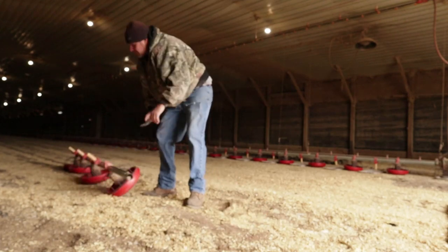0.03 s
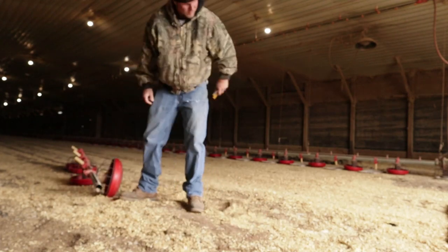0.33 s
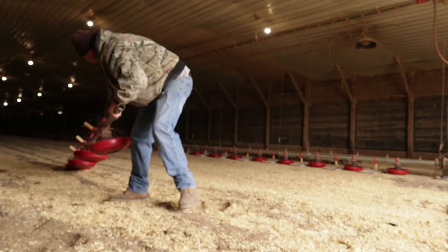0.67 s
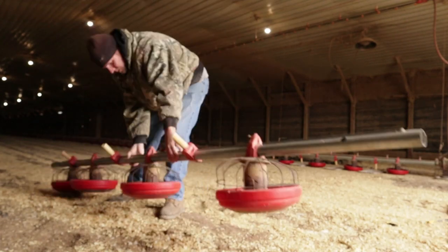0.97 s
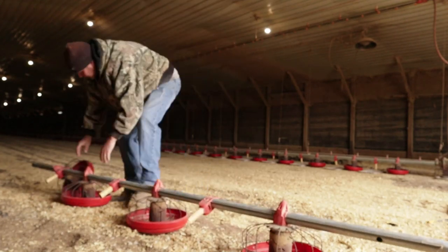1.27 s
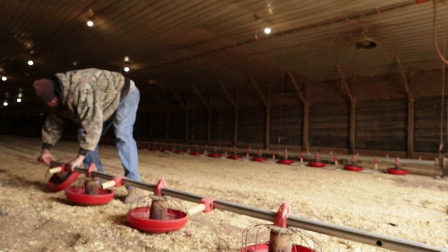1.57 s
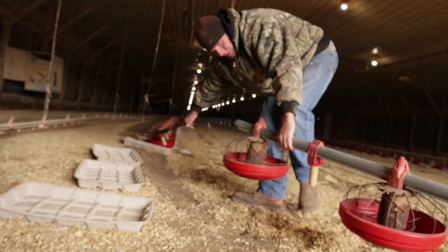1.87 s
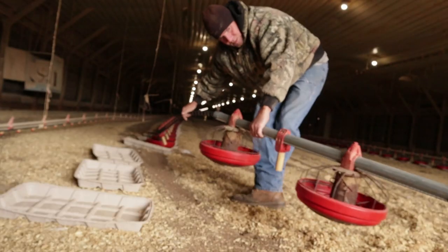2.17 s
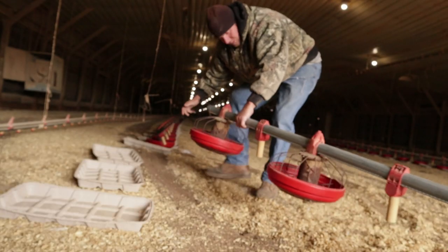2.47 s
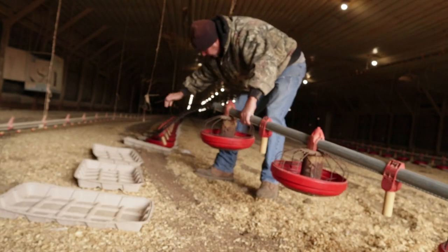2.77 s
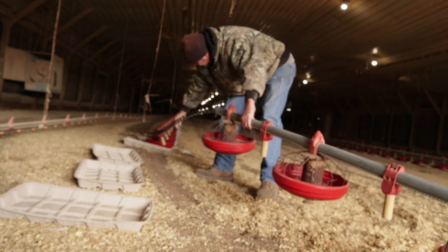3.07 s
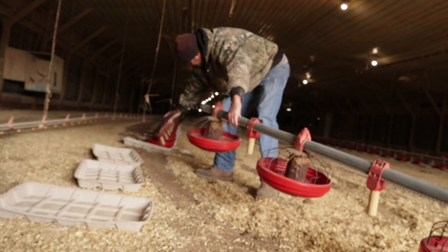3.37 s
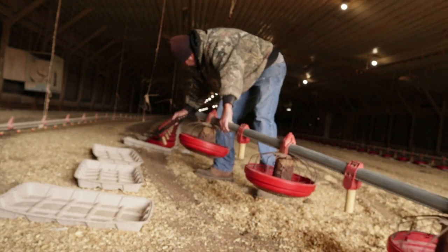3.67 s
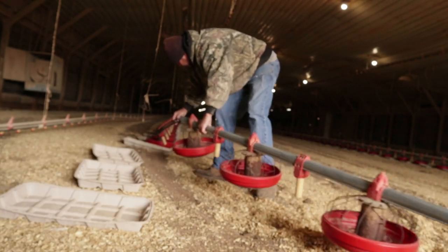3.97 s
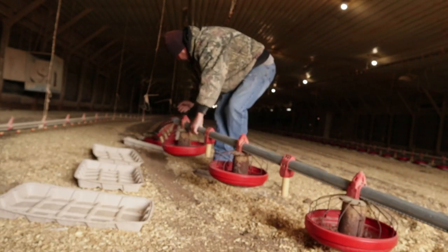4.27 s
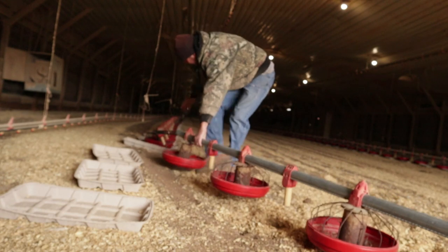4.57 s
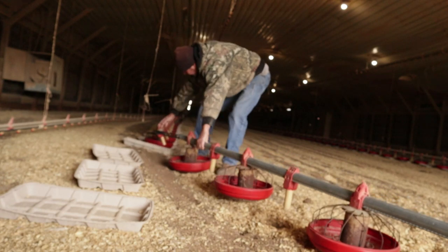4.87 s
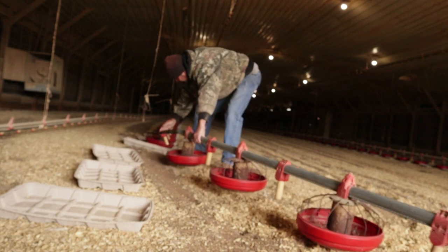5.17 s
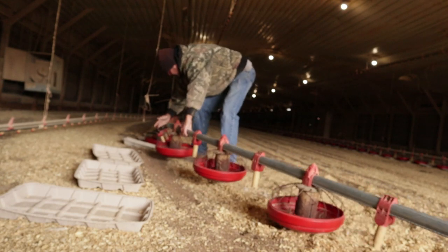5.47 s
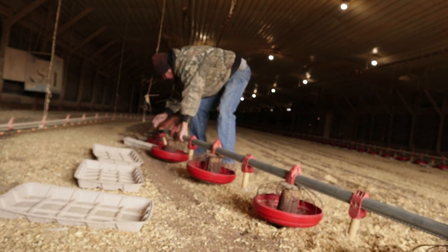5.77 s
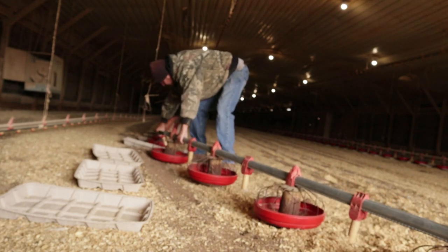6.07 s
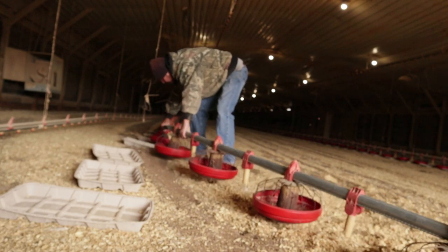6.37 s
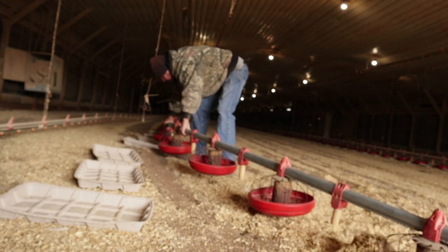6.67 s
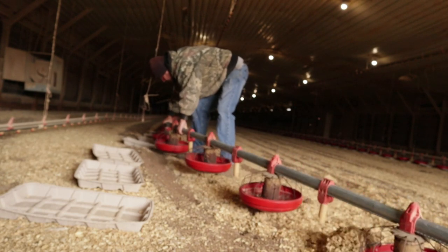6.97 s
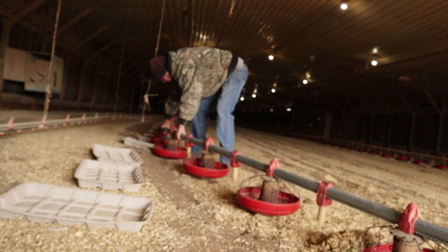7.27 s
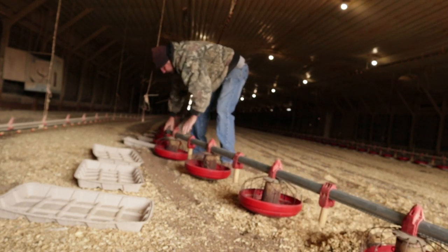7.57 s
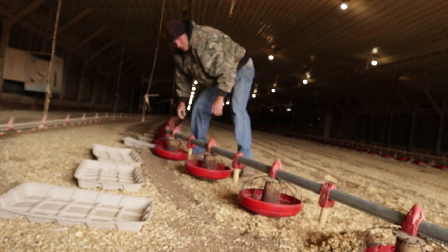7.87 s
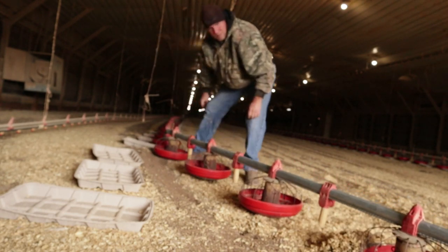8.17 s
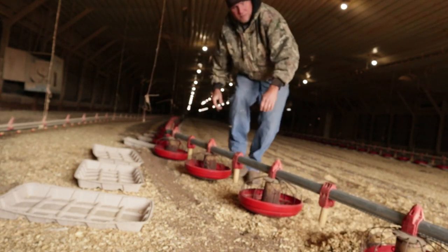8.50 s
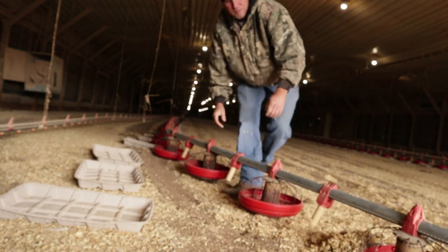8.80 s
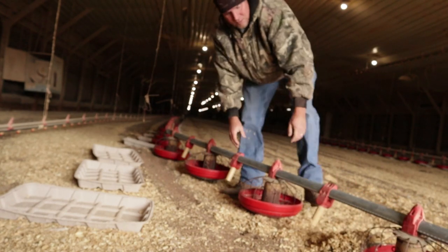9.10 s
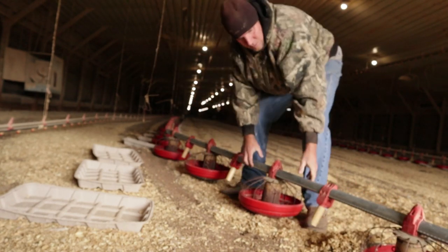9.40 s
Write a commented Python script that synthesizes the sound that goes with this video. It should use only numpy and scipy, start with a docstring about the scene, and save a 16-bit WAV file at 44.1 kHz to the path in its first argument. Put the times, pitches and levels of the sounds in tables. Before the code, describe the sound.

Over a quiet hiss of air in a long poultry house, sharp, close clicks and knocks come from metal parts being fitted together. Then steel scrapes on steel four times, each stroke uneven, with cracking jolts, a faint ring and jingling wire pan guards. After a brief squeak things go quieter, leaving faint rustles of wood shavings and one more clank of the tube with a dull boot thud.

```python
"""Small metal fittings click close by over a quiet hiss of air, then knock together: a worker is
assembling a feed line in a long poultry house. The steel tube is worked along in four rasping
strokes; friction makes it catch, jolt and ring faintly, and the shaking sets the wire guards of
its pans chattering. A bracket squeaks on the tube, and boots thud and scuff in the wood shavings."""
import sys
import numpy as np
from scipy import signal
from scipy.fft import rfft, irfft
from scipy.io import wavfile
from scipy.ndimage import uniform_filter1d

SR = 44100
rng = np.random.default_rng(int(sys.argv[2]) if len(sys.argv) > 2 else 0)


def log_audio(samples):
    """Write samples as a 16-bit WAV file to the path given in sys.argv[1]."""
    # one column per channel
    frames = np.atleast_2d(samples).T
    # limit to full scale, then quantise
    limited = np.clip(frames, -1, 1)
    pcm = np.round(limited * 32767).astype(np.int16)
    wavfile.write(sys.argv[1], SR, pcm)


N = 416304
T = np.arange(N) / SR

# tone of the bright close hiss and of the duller house air: f/Hz, level/dB
BRIGHT_AIR_EQ = [(30, 1), (90, -11), (400, -2), (1000, -4), (2500, -8.5), (8000, -9.5), (14500, -9),
                 (16000, -13)]
HOUSE_AIR_EQ = [(20, -11), (70, -1.5), (130, 2.5), (350, -3), (800, -4), (1500, -7.5), (2400, -11),
                (6000, -13), (10000, -17), (16000, -18.5)]
# crossfade between the two, with a brief dip: t/s, bright gain, house gain
AIR_FADE = [(1.762, 1, 0), (1.778, .1, 0), (1.795, 0, .15), (1.83, 0, 1)]
# the house air sits lower while the tube is worked: t/s, level/dB
AIR_DUCK = [(1.8, -4), (3.1, -4), (4.9, -1), (6.15, -1), (7.6, 0)]
# fittings snapping: t/s, level/dB, rattle against crack/dB, tilt/(dB per octave)
FITTING_SNAPS = [(0.095, -1.5, -7, 0.5), (0.143, -21, -7, 0.5), (0.259, -25.5, -12, 4),
                 (0.5166, 0.5, -17.5, -2), (0.584, -20, 10, 1), (0.619, -28, -14, -1.5),
                 (0.651, -17, -16, 10), (0.658, -21.5, 6, 1), (0.684, -26, -16, -2), (0.8443, -26, 4, 0),
                 (0.861, -18.5, 2, 4), (0.932, -25, 11, -0.5), (1.063, -27, 0, -1), (1.069, -20, 4, -0.5),
                 (1.0847, 4.5, -14, 2), (1.093, -13, -5, -0.5), (1.1812, -4.5, -9.5, 1),
                 (1.2155, -20, -13, -1), (1.2202, -9.5, -17, -2.5), (1.3226, -28, -18, -1.5),
                 (1.3635, -18.5, -11, -1), (1.433, -21, -15, 10), (1.563, -23, -18, -2.5),
                 (1.731, -22.5, 3, -2.5)]
# tone of a snap: f/Hz, level/dB
SNAP_EQ = [(50, -4.5), (500, -10), (1000, -7), (1800, -6), (2700, -2), (4000, -8.5), (8000, -6),
           (14000, -7), (16000, -7)]
# resonances of a fitting: f/Hz, width/Hz, level/dB
FITTING_RING = [(2350, 140, -7), (2800, 300, -1), (4700, 110, -5), (6840, 320, -2), (12500, 140, -27)]
# boots and tube landing on the litter: t/s, level/dB, f/Hz, width/Hz, length/s
LITTER_THUDS = [(0.21, -58.5, 497, 700, 0.12), (0.35, -54, 495, 700, 0.097), (0.46, -46, 540, 900, 0.11),
                (2.70, -48, 387, 300, 0.12), (2.87, -45, 327, 200, 0.069), (4.32, -46, 340, 150, 0.074),
                (4.42, -41.5, 376, 200, 0.067), (4.685, -33.5, 310, 109, 0.04),
                (5.163, -20, 400, 340, 0.042), (7.375, -29, 270, 403.4, 0.053),
                (8.299, -50, 315, 350, 0.068), (8.325, -52.5, 480, 800, 0.072),
                (8.728, -29, 370, 332, 0.12)]
# swells of shavings and clothing: middle t/s, level/dB, half length/s
RUSTLE_SWELLS = [(.79, -47.5, 0.14), (0.866, -31.5, 0.02), (0.964, -43, 0.052), (1.173, -37, .016),
                 (1.41, -47.5, 0.074), (1.75, -31.5, 0.0068), (7.377, -41.5, 0.025), (7.587, -49, 0.11),
                 (8.0, -57, 0.053), (8.6, -50.5, 0.01), (9.03, -54, 0.042), (9.118, -53, .014),
                 (9.417, -45.5, 0.037)]
# tone of the shavings: f/Hz, level/dB
SHAVINGS_EQ = [(100, -11), (500, -11), (1100, -1), (2000, -1.5), (2800, 3.5), (4000, -2), (7500, -1),
               (11000, -10), (16000, -21)]
# parts knocking together: t/s, level/dB, f/Hz, width/Hz, decay/s
PART_KNOCKS = [(1.105, -14, 420, 900, 0.003), (1.468, -5.5, 3140, 2400, 0.0049),
               (1.4736, -1.5, 695, 1900, 0.004), (1.4773, -8.5, 400, 400, 0.012),
               (1.477, -5.5, 155, 130, 0.017), (1.487, 1, 3300, 2200, 0.00091),
               (1.492, -19, 2600, 3500, 0.029), (1.5112, 0, 3470, 650, 0.0023),
               (1.5164, -4, 160, 324, 0.0035), (1.533, -14, 1880, 2500, 0.008),
               (1.5439, -9.5, 1900, 1700, 0.0019), (1.6073, -0.5, 2980, 810, 0.0078),
               (1.614, -2, 2730, 750, 0.0043), (1.6535, -14, 2330, 2500, 0.0028),
               (1.6689, -2.5, 2210, 1190, 0.005), (1.671, -1, 660, 550, 0.0015),
               (1.744, -17, 3620, 3000, 0.0041), (1.752, -1.5, 1260, 1900, 0.0012)]
# pushes on the tube, a light one often leading into a hard one: t/s, attack/s, hold/s, level/dB,
# fall/(dB per s), boom against level/dB, sizzle against level/dB, singing note/dB
TUBE_PUSHES = [(1.774, .16, 0.16, -25, 200, -15.5, -6, -70), (2.085, 0.066, 0.4, -15, 114, -17, -9, -65.5),
               (3.09, 0.26, .08, -38, 199.5, -5.5, -4.5, -75),
               (3.376, 0.11, 0.13, -18.5, 200, -12.5, -10, -55),
               (3.447, 0.22, 0.48, -14.5, 190, -18.5, -7.5, -40),
               (4.433, .21, 0.025, -25.5, 241, -8.5, -7, -57), (4.74, 0.43, .02, -33, 200, -9, -3, -70),
               (4.998, 0.2, 0.61, -17, 104, -12.5, -5.5, -36),
               (6.187, 0.095, 0.18, -28.5, 200, -7.5, -8.5, -46),
               (6.139, .44, 0.47, -17.5, 176, -13, -10.5, -37)]
# tone of steel sliding on steel: f/Hz, level/dB
RASP_EQ = [(40, -44), (80, -24.5), (150, -14.5), (300, -10.5), (600, -13), (1000, -3.5), (1800, -3.5),
           (2600, 1), (3500, -2.5), (4600, -1), (7000, -9.5), (8400, -11), (10000, -19.5), (16000, -37.5)]
# resonances of the tube: f/Hz, width/Hz, level/dB
TUBE_RING = [(372, 85, 0), (515, 47, -11), (670, 113, -6), (852, 50, -5), (1308, 59, -1.5), (1560, 87, -3),
             (1920, 59, -9), (2145, 35, -13.5), (2310, 35, -10), (2680, 33, -20.5), (2970, 110, -15),
             (3140, 30, -9), (3820, 53, -5.5), (3720, 70, -12), (4180, 30, -2.5), (4310, 12, -4),
             (4600, 70, -26), (4940, 53, -7), (5220, 6.1, -22), (5680, 13, -17.5), (5760, 380, -9.5),
             (7120, 110, -8), (7470, 105, -1), (7670, 34, -18), (7750, 63, -9), (7680, 140, -10)]
# the tube catching hard or being bumped: t/s, level/dB, decay/s
TUBE_JOLTS = [(1.912, -25.5, 0.038), (2.127, -14, 0.03), (2.1495, -7, 0.0032), (2.2074, -8.5, 0.0067),
              (2.2208, -7, 0.0065), (2.354, -17, 0.032), (2.429, -16, 0.0074), (2.502, -10, 0.0093),
              (2.609, -15, 0.021), (2.703, -17, 0.0041), (2.856, -32.5, 0.0048), (3.005, -41.5, 0.007),
              (3.223, -40.5, 0.0056), (3.352, -28.5, 0.0058), (3.605, -19.5, 0.014), (3.697, -6.5, 0.0053),
              (3.7637, -10, 0.061), (3.817, -19, 0.027), (3.878, -13, 0.0098), (3.9768, -9, 0.0064),
              (4.0157, -12, 0.0097), (4.0707, -13, 0.015), (4.1363, -12.5, 0.016), (4.27, -29, 0.0052),
              (4.368, -32, .007), (4.503, -37, .04), (4.786, -32, 0.0071), (5.155, -11, 0.031),
              (5.2454, -13.5, 0.045), (5.32, -17, 0.037), (5.405, -14.5, 0.045), (5.508, -12.5, 0.018),
              (5.6082, -13, 0.041), (5.695, -13.5, 0.023), (5.8, -13.5, 0.015), (5.904, -22.5, 0.024),
              (6.036, -37.5, .008), (6.265, -30.5, 0.017), (6.39, -24.5, 0.044), (6.627, -13, 0.018),
              (6.764, -14.5, 0.025), (7.0158, -11, 0.0095), (7.0845, -15, 0.0038), (7.379, -25, 0.043),
              (7.5365, -25.5, 0.0011), (8.73, -18.5, 0.055), (8.757, -20.5, 0.02), (8.801, -26.5, 0.012)]
# a bracket rubbing on the tube, then two brief bright squeaks near 6 kHz as the tube is bumped: t/s, level/dB,
# f/Hz, width/Hz, length/s
BRACKET_SQUEAKS = [(2.78, -40.5, 1210, 380, 0.055), (2.885, -41, 1240, 280, 0.055),
                   (7.19, -42, 1310, 340, 0.16), (7.376, -27, 5986, 1834, 0.024),
                   (7.53, -32.5, 5550, 2590, .007)]


def undb(db):
    """Decibels to gain."""
    return 10 ** (np.asarray(db) / 20)


def unit(x):
    """Scale to an rms of 1."""
    return x / np.sqrt(np.mean(x ** 2))


def curve(rows):
    """One automation line for each column after the time."""
    s, *columns = np.transpose(rows)
    return [np.interp(T, s, c) for c in columns]


def add(track, s, sound):
    """Mix a sound into a track at time s."""
    start = max(int(s * SR), 0)
    track[start:start + len(sound)] += sound[:N - start]


def colour(x, points, size=2048):
    """Minimum-phase EQ through (f/Hz, level/dB) points, with unit gain for white noise."""
    hz, db = np.transpose(points)
    f = np.maximum(np.arange(size // 2 + 1) * SR / size, 1)
    gain = undb(np.interp(np.log(f), np.log(hz), db))
    cepstrum = irfft(np.log(gain))
    cepstrum[1:size // 2] *= 2
    cepstrum[size // 2 + 1:] = 0
    response = irfft(np.exp(rfft(cepstrum)))
    return signal.fftconvolve(x, response / np.linalg.norm(response))[:len(x)]


def resonate(x, hz, width_hz):
    """One resonance, gain 1 at its centre."""
    return signal.lfilter(*signal.iirpeak(hz, hz / width_hz, fs=SR), x + 1e-18)


def cut(x, hz, kind, order=4):
    """Low-pass or high-pass."""
    return signal.sosfilt(signal.butter(order, hz, kind, fs=SR, output="sos"), x + 1e-18)


def grit(count, spread_db, grain_s):
    """Dense tiny contacts: noise whose strength jumps from grain to grain."""
    step = max(int(grain_s * SR), 1)
    sizes = np.repeat(undb(spread_db * rng.standard_normal(count)), step)[:count]
    return unit(rng.standard_normal(count) * sizes)


def walk(rate_hz):
    """A smooth random wander with a spread near 1."""
    count = int(rate_hz * N / SR) + 2
    return 1.32 * np.interp(T * rate_hz, np.arange(count), rng.standard_normal(N // 100)[:count])


def echoes(x, t60):
    """Dense reflections that fall 60 dB in t60 seconds."""
    t = T[:SR]
    tail = rng.standard_normal(SR) * undb(-60 * t / t60) * (1 - np.exp(-t / 0.0023))
    return signal.fftconvolve(x, tail / np.linalg.norm(tail))[:N]


def air(level_db=-51):
    """A bed of hiss, bright at first; it dips briefly and goes on as the duller air of the house."""
    bright_gain, house_gain = curve(AIR_FADE)
    bright = colour(rng.standard_normal(N), BRIGHT_AIR_EQ)
    house = undb(curve(AIR_DUCK)[0]) * colour(rng.standard_normal(N), HOUSE_AIR_EQ)
    return undb(level_db) * (bright_gain * bright + house_gain * house)


def clicks(rattle_s=0.0099, grip_detune=0.067):
    """Each snap is one hard tick, a crack and a short rattle, all ringing the fitting."""
    out, t = np.zeros(N), T[:SR // 6]
    for s, db, rattle_db, tilt in FITTING_SNAPS:
        crack_s = 0.0011 * 2 ** (-db / 26)  # softer snaps crack longer
        envelope = np.exp(-t / crack_s) + undb(rattle_db) * np.exp(-t / rattle_s)
        force = envelope * grit(len(t), spread_db=0.81, grain_s=.0004)
        force[0] = undb(9.5)  # the tick
        eq = [(hz, level + tilt * np.log2(max(hz, 1000) / 3000)) for hz, level in SNAP_EQ]
        crack = colour(force, eq)
        grip = 1 + grip_detune * rng.uniform(-0.7, 1)  # each new grip retunes the ring
        ring = sum(undb(level) * resonate(crack, grip * hz, width) for hz, width, level in FITTING_RING)
        snap = crack + ring
        add(out, s, undb(db + 2) * snap / np.abs(snap).max())
    return out + undb(-31) * echoes(out, t60=0.22)


def rubs(table):
    """Soft contacts swell and fade in one resonance each: low ones thud, high ones squeak."""
    out = np.zeros(N)
    for s, db, hz, width, length_s in table:
        progress = T[:SR // 3] / length_s
        force = rng.standard_normal(len(progress)) * progress * np.exp(-(2 * progress) ** 2)
        rub = resonate(resonate(force, hz, width), hz, 2 * width)
        rms = np.sqrt(np.sum(rub ** 2) / (length_s * SR))
        add(out, s, undb(db) * rub / rms)
    return out


def rustle():
    """Shavings crackle under the boots and the jacket brushes along; each move swells and fades."""
    swell = sum(undb(db) * np.exp(-((T - s) / half_s) ** 2) for s, db, half_s in RUSTLE_SWELLS)
    flutter = undb(1.5 * walk(70))
    return swell * flutter * colour(grit(N, spread_db=5.8, grain_s=0.00057), SHAVINGS_EQ)


def knocks():
    """Heavier, softer contacts: a brief chatter through one hollow resonance, with little treble."""
    out, t = np.zeros(N), T[:SR // 6]
    for s, db, hz, width, decay_s in PART_KNOCKS:
        force = rng.standard_normal(len(t)) * np.exp(-t / decay_s)
        body = cut(resonate(force, hz, width), 4600, "low", order=5)
        knock = body / np.abs(body).max() + undb(-28) * force
        add(out, s, undb(db) * knock)
    return out + undb(-17) * echoes(out, t60=0.048)


def push(start, attack_s, hold_s, fall_db_per_s):
    """Envelope of one push: effort builds, holds and dies away."""
    rise = np.clip((T - start) / attack_s, 0, 1) ** 2
    return rise * undb(-fall_db_per_s * np.maximum(T - start - attack_s - hold_s, 0))


def effort(settle_db=-12.5, settle_db_per_s=59.5):
    """Drive for rasp, boom and sizzle: the strongest push of the moment, or the shaking it leaves."""
    strongest = np.zeros((3, N))
    for s, attack_s, hold_s, db, fall, boom_db, sizzle_db, _ in TUBE_PUSHES:
        shaking = push(s, attack_s, hold_s, settle_db_per_s)
        slide = np.maximum(push(s, attack_s, hold_s, fall), undb(settle_db) * shaking)
        bands = np.array([slide, undb(boom_db) * shaking, undb(sizzle_db) * slide])
        strongest = np.maximum(strongest, undb(db) * bands)
    return strongest


def sliding(drive, boom_drive, sizzle_drive):
    """Steel rasps over steel: dense, uneven contacts with a boom below and a sizzle above."""
    contacts = grit(N, spread_db=1.48, grain_s=0.00046) * undb(1.07 * walk(140))
    rasp = colour(contacts, RASP_EQ)
    boom = unit(cut(rasp, 690, "low"))
    mids = unit(cut(cut(rasp, 700, "high"), 5490, "low"))
    sizzle = unit(cut(rasp, 7000, "high"))
    return undb(-4.5) * (drive * mids + boom_drive * boom + sizzle_drive * sizzle)


def tube():
    """Rasp and jolts ring the tube; as the contact point shifts, each mode comes and goes by itself."""
    drive, boom_drive, sizzle_drive = effort()
    force = sticking() * sliding(drive, boom_drive, sizzle_drive) + jolts(drive)
    modes = sum(undb(db) * resonate(force * undb(6.5 * walk(28)), hz, width)
                for hz, width, db in TUBE_RING)
    steel = undb(-0.89) * force + modes + jingle(force)
    return steel + undb(-13.5) * echoes(steel, t60=0.11)


def tube_note(hz=1512, wander_hz=10.15, waver_db=2, fall_db_per_s=53):
    """One lightly damped mode of the tube swells with each push and sings on, wavering a little."""
    phase = 2 * np.pi * np.cumsum(hz + wander_hz * walk(40)) / SR
    note = unit(np.sin(phase) * undb(waver_db * walk(25)))
    swell = sum(undb(note_db) * push(s, attack_s, hold_s, fall_db_per_s)
                for s, attack_s, hold_s, *_, note_db in TUBE_PUSHES)
    return note * swell


def jingle(force, count=1800, loose_db=-32.5):
    """The wire guards of the hanging pans chatter: short pings, as strong as the tube is shaken."""
    shake = np.sqrt(np.abs(uniform_filter1d(force ** 2, int(0.0023 * SR))))
    shake = shake ** 2 / (shake + undb(loose_db))  # below loose_db the guards hardly stir
    out, t = np.zeros(N), T[:SR // 16]
    for when, pitch, size, sustain in rng.random((count, 4)):
        s = when * T[-1]
        hz = 1400 + 7300 * pitch ** 1.4
        ping = np.sin(2 * np.pi * hz * t) * np.exp(-t / (0.0068 + .014 * sustain))
        add(out, s, shake[int(s * SR)] * undb(-8.5 + 9.2 * size - 4 * pitch) * ping)
    return out


def sticking(dip_db=-3.5):
    """Friction holds the tube for a moment, so the rasp ducks just ahead of each big jolt."""
    hold, t = np.zeros(N), T[:SR // 25]
    for s, *_ in TUBE_JOLTS:
        add(hold, s - len(t) / SR, (t / t[-1]) ** 2)
    return undb(dip_db * hold)


def jolts(drive, catches=130, catch_s=0.0075):
    """The tube catches and lets go: the rasp flares at once and dies away."""
    force, t = np.zeros(N), T[:SR // 2]
    for s, db, decay_s in TUBE_JOLTS:
        add(force, s, undb(db) * np.exp(-t / decay_s))
    for when, size in rng.random((catches, 2)):  # small chance catches ride on the slide
        s = when * T[-1]
        strength = drive[int(s * SR)] * undb(-7.5 + 7 * size)
        add(force, s, strength * np.exp(-t / catch_s))
    return undb(-1) * colour(force * grit(N, spread_db=3.1, grain_s=.0004), RASP_EQ)


def scene():
    """The metalwork, the litter underfoot and the air in one mono mix."""
    metal = clicks() + knocks() + tube() + tube_note() + rubs(BRACKET_SQUEAKS)
    litter = rubs(LITTER_THUDS) + rustle()
    return (metal + litter + air())[None]


def record(dry, top_hz=15800):
    """A soft clip rounds the highest peaks and a steep low-pass trims the top."""
    rounded = dry / (1 + dry ** 6) ** (1 / 6)
    return signal.sosfilt(signal.ellip(8, .2, 70, top_hz, fs=SR, output="sos"), rounded)


dry = scene()
out = record(dry)
log_audio(out)
```